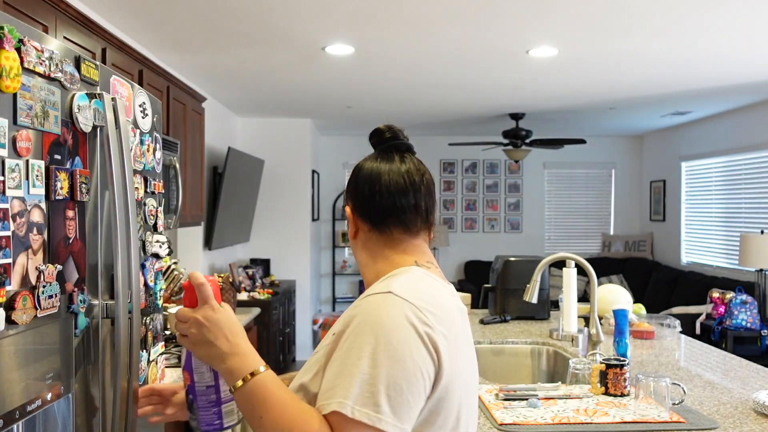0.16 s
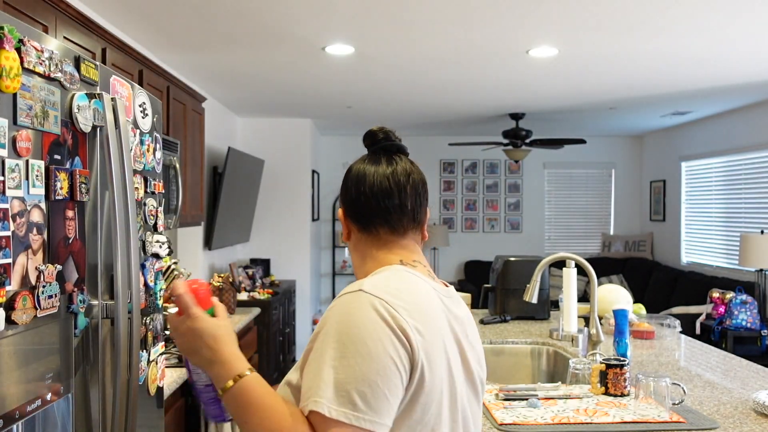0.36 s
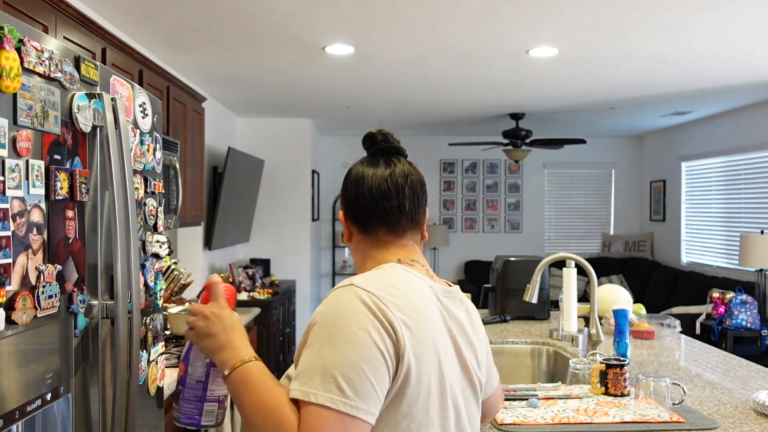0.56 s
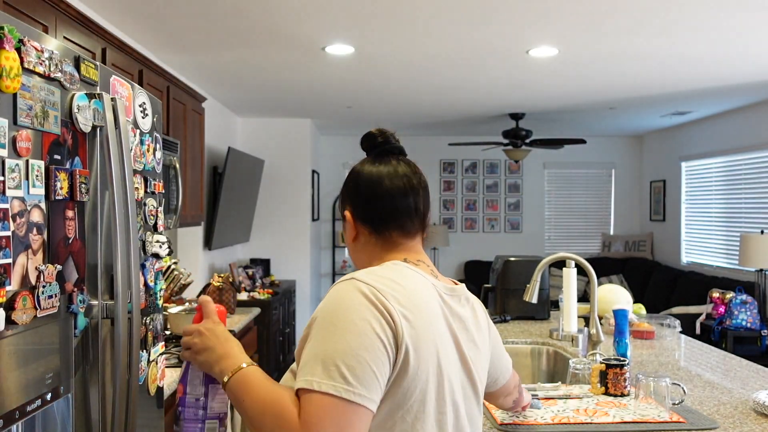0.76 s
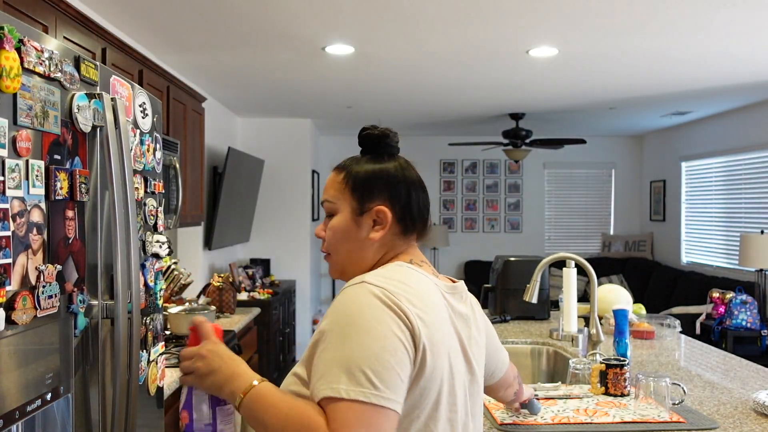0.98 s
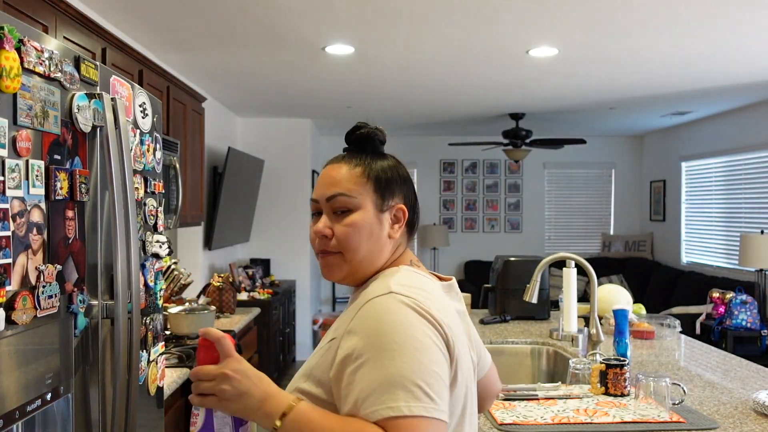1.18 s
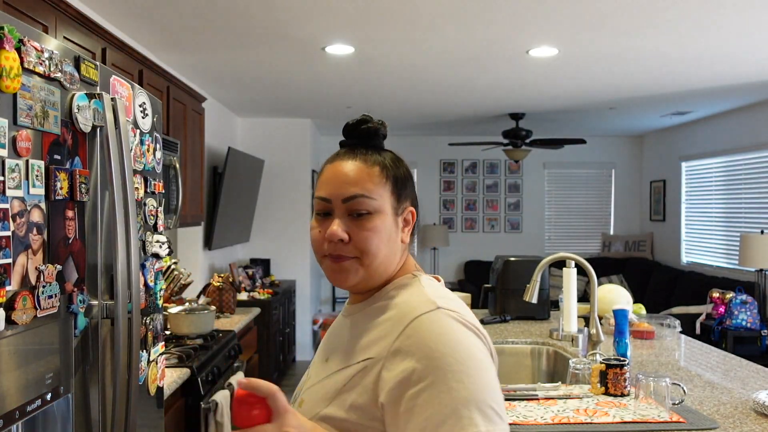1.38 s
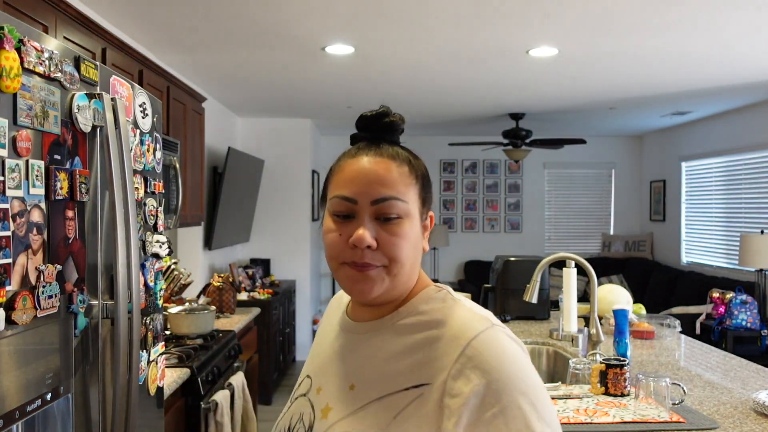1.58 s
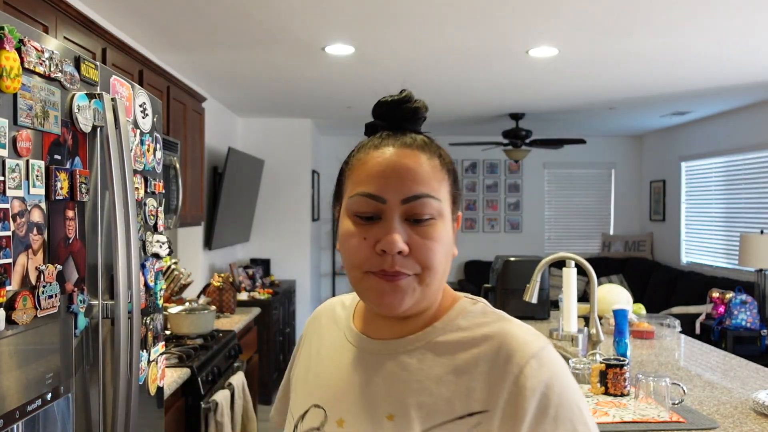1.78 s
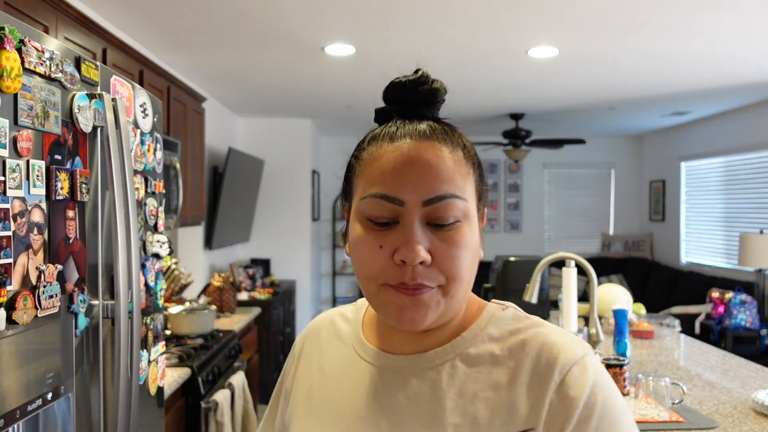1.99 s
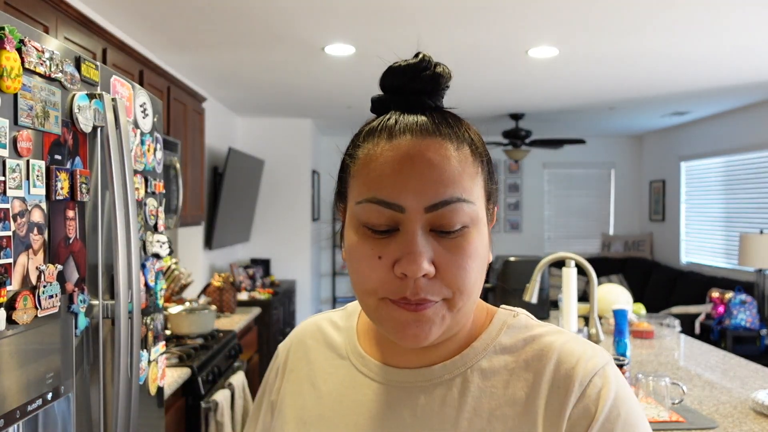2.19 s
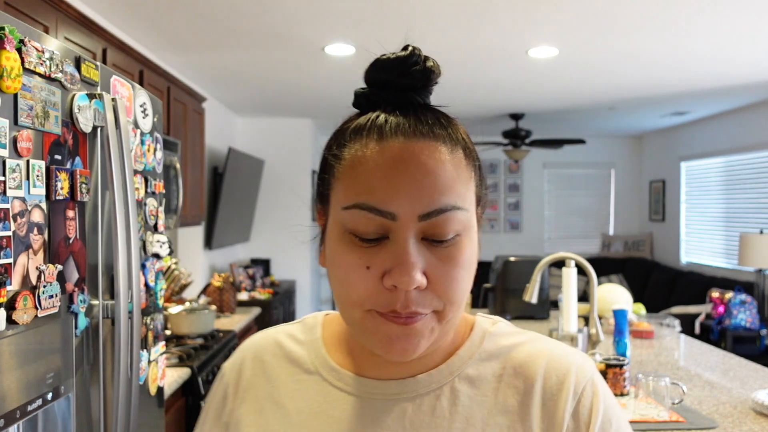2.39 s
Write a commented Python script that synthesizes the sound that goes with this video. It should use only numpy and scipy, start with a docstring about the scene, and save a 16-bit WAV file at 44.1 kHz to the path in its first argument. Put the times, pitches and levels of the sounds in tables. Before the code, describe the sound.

A refrigerator door shuts close by with a sharp thud and a brief rattle of shelves. A plastic bag then rustles and crinkles quietly over a faint kitchen hum, until a hand knocks twice on the microphone and rubs it.

```python
"""A kitchen. A refrigerator door swings shut close by: its edge lands in a few quick contacts,
the cabinet booms, the shelves rattle and the room rings. A plastic bag rustles, crinkles and taps
in a hand over a faint appliance hum. Near the end a hand knocks twice against the microphone's
housing and rubs on it."""
import sys
import numpy as np
from scipy import signal
from scipy.fft import rfft, irfft, next_fast_len
from scipy.io import wavfile
from scipy.ndimage import uniform_filter1d

SR = 44100
rng = np.random.default_rng(int(sys.argv[2]) if len(sys.argv) > 2 else 0)


def int16_out(signal):
    """Quantize to a 16-bit WAV file."""
    q = np.round(np.clip(np.atleast_2d(signal).T, -1, 1) * 32767)
    wavfile.write(sys.argv[1], SR, q.astype(np.int16))


N = 107868
T = np.arange(N) / SR

# Edge contacts (time [s], relative level [dB], tilt [dB/oct], t60 [s], ring [Hz], ring boost [dB])
CONTACTS = [(0.1529, -5.5, 1.5, 0.021, 1340, 5), (.1565, -1, 0.5, .024, 1360, 5.5),
            (0.1592, -6, 2.5, 0.013, 3440, 8.5), (.164, 1.5, -3, 0.029, 2030, 5.5),
            (.168, -12.5, -6, 0.035, 624, 10)]
# Door panel modes; low cabinet modes (frequency [Hz], relative level [dB], t60 [s])
PANEL_MODES = [(406.6, 4, 0.4), (465, 2, 0.34), (524, 20, 0.12), (694, 5.5, 0.26), (887, 1, 0.52),
               (1324, -4, 0.26), (1557, -4, 0.64), (1704, -6, 0.54), (2104, -3, 0.23)]
CABINET_MODES = [(65.1, -18, 0.68), (90.4, 0, 0.34), (126, 0, 0.35), (185, -12, 0.32)]
# Swing rumble (time [s], level [dB])
SWING_ENVELOPE = [(0, -40.5), (.06, -45.5), (.15, -38.5), (.2, -73)]
# Contact, shelf and swing spectra (frequency [Hz], relative density [dB])
CONTACT_SPECTRUM = [(70, -17), (110, -18.5), (190, -8), (400, -8.5), (530, -3.5), (750, -7), (1020, -8),
                    (1350, -1.5), (1900, -5.5), (3600, -9), (5500, -17), (7500, -25), (10000, -26),
                    (15000, -42)]
RATTLE_SPECTRUM = [(55, -9.5), (95, -7), (135, -5), (300, -3.5), (600, -3), (1000, -7.5), (1500, -3),
                   (2500, -9.5), (3700, -15.5), (7000, -25), (10000, -35), (15000, -48)]
SWING_SPECTRUM = [(50, -2), (100, -4.5), (160, -7.5), (400, -13.5), (600, -6), (900, -7.5), (1450, -1.5),
                  (2200, -9.5), (8000, -34.5)]
# Door stereo width (frequency [Hz], side gain [dB])
DOOR_WIDTH = [(60, -25), (500, -11), (4400, -13.5), (8500, -10), (13000, -26)]
def door():
    """The door swings, its edge lands, the panel rings, the cabinet booms and the shelves rattle."""
    edge, body = np.zeros(N), np.zeros(N)
    for start_s, db, tilt_db, t60_s, ring_hz, ring_db in CONTACTS:
        contact = crack(CONTACT_SPECTRUM, t60_s, tilt_db)
        add(edge, start_s, undb(db - 10.5) * resonate(contact, ring_hz, ring_db, q=4.8))
    impact_s = CONTACTS[1][0]
    add(body, impact_s, undb(-34) * ring(PANEL_MODES, rise_s=0.0036))
    add(body, impact_s, undb(-26) * ring(CABINET_MODES, rise_s=0.042))
    shake_start_s, shake_peak_s = 0.167, 0.2
    shake = np.interp(T, [shake_start_s, shake_peak_s], [0, 1])
    shake *= fade(np.maximum(T - shake_peak_s, 0), t60_s=0.43)
    rattle = undb(-19.5) * colour(shake * grains(N, rate_hz=4000, spread_db=1), RATTLE_SPECTRUM)
    swing = curve(SWING_ENVELOPE) * colour(rng.standard_normal(N), SWING_SPECTRUM)
    out = kitchen(edge, wet_db=-6, width=DOOR_WIDTH)
    out += kitchen(rattle + body + swing, wet_db=-15.5, width=DOOR_WIDTH)
    return pan(out, -0.4)


# Knocks (time [s], click gain [dB], thump gain [dB], thump pitch [ratio], tilt [dB/oct], thump lag [s])
KNOCKS = [(2.1776, -31, -30, 1.25, 4, 0.00202), (2.214, -18, -15.5, 1, -1.5, .006)]
# Housing modes at pitch ratio 1 (frequency [Hz], relative level [dB], t60 [s])
HOUSING_MODES = [(89.7, -7, 0.225), (145, 4.5, 0.076), (171.1, -2, 0.23), (212, -8.5, 0.22),
                 (316.6, -25, 0.25), (437, -20, 0.2), (1295, -14, 0.063), (1685, -11.5, 0.077),
                 (4130, -34, .22)]
# Finger rub (time [s], level [dB])
RUB_ENVELOPE = [(2.17, -85), (2.183, -45.5), (2.28, -41), (2.32, -47.5), (2.36, -44), (2.4, -40),
                (2.45, -49.5)]
# Knock and rub spectra (frequency [Hz], relative density [dB])
KNOCK_SPECTRUM = [(350, -4.5), (640, -7), (950, -0.5), (1350, 0), (2000, -4.5), (3000, -11), (4200, -13),
                  (6200, -23), (7200, -24), (10000, -25), (15000, -40)]
RUB_SPECTRUM = [(50, -23), (115, 1.5), (175, 1), (280, -7.5), (400, -16), (570, -12), (1630, -10.5),
                (4340, -23), (8070, -27), (15000, -42)]
def hand_on_housing():
    """Knocks click and thump through the small housing, which radiates little bass; fingers rub."""
    clicks, thumps = np.zeros(N), np.zeros(N)
    for start_s, click_db, thump_db, ratio, tilt_db, lag_s in KNOCKS:
        add(clicks, start_s, undb(click_db) * crack(KNOCK_SPECTRUM, t60_s=0.057, tilt_db=tilt_db))
        add(thumps, start_s + lag_s, undb(thump_db) * ring(HOUSING_MODES, rise_s=0.0056, ratio=ratio))
    rub = colour(curve(RUB_ENVELOPE) * grains(N, rate_hz=2400, spread_db=-1), RUB_SPECTRUM)
    return kitchen(clicks, wet_db=-11) + highpass(thumps, hz=89, order=4) + rub


# Bag and sleeve rustle (time [s], level [dB])
RUSTLE_ENVELOPE = [(0, -39.5), (.14, -46.5), (.3, -54), (.48, -57), (.535, -42.5), (.57, -49), (.68, -46),
                   (.77, -42.5), (.86, -47.5), (.98, -47.5), (1.08, -52), (1.16, -42), (1.23, -39),
                   (1.275, -50), (1.32, -45), (1.38, -42), (1.48, -48), (1.56, -43), (1.74, -49.5),
                   (1.83, -53), (1.92, -63), (2.0, -55.5), (2.3, -55.5), (2.4, -50)]
# Crinkles (peak time [s], level [dB], length [s], tilt [dB/oct], fold ring [Hz], ring boost [dB])
CRINKLES = [(0.598, -36, 0.0092, 1.5, 1500, 8), (0.613, -33.5, .006, 4, 1535, 25),
            (0.624, -39.5, 0.0093, 7, 5000, 12), (0.656, -38, 0.0073, -3, 1543, 12),
            (0.773, -37, 0.0075, -2, 1410, 9), (0.801, -40.5, .012, -3.5, 1500, -2),
            (0.902, -41, 0.011, 2.5, 1550, 7), (0.988, -39, 0.0073, -1, 1530, -15),
            (1.136, -40.5, 0.012, -1.5, 1200, 7), (1.204, -38, 0.0067, 7, 9100, -2),
            (1.213, -31.5, 0.003, 6, 1240, 33), (1.242, -34, 0.005, -1, 1490, 10),
            (1.49, -39, 0.005, -2.5, 1170, -5), (1.549, -32, 0.0077, -2.5, 1570, 13),
            (1.559, -26, 0.0045, -0.5, 3360, 9), (1.632, -30.5, 0.0035, -1.5, 1990, 7),
            (1.645, -33.5, .01, 3.5, 1640, 9)]
# Rustle, crinkle and film snap spectra (frequency [Hz], relative density [dB])
RUSTLE_SPECTRUM = [(120, -27), (200, -10.5), (376, -15), (560, -4), (864, -8.5), (1490, -1.5), (2170, -8),
                   (2900, -3), (3600, -9.5), (5260, -11), (15000, -37.5)]
CRINKLE_SPECTRUM = [(300, -26.5), (450, -13.5), (570, -6.5), (850, -13), (1250, -2.5), (1650, 1.5),
                    (2400, -8), (3000, -6), (5000, -13), (10000, -34.5), (15000, -49)]
SNAP_SPECTRUM = [(6500, 4), (10000, -5), (12000, -14), (15000, -24)]
def bag():
    """Fine creases rustle throughout; folds give way in click clusters with sparse bright snaps."""
    flutter_db = 1.4 * drift(rate_hz=63)
    motion = curve(RUSTLE_ENVELOPE) * undb(flutter_db)
    out = colour(motion * grains(N, rate_hz=2000, spread_db=2), RUSTLE_SPECTRUM)
    size = SR // 8
    for peak_s, db, length_s, tilt_db, fold_hz, fold_db in CRINKLES:
        rise_s = length_s / 2
        age = T[:size] / rise_s
        swell = age * np.exp(1 - age)
        cluster = colour(swell * grains(size, rate_hz=5500, spread_db=1.5), CRINKLE_SPECTRUM, tilt_db)
        snaps = colour(swell * grains(size, rate_hz=550, spread_db=0.5), SNAP_SPECTRUM)
        crinkle = resonate(cluster + undb(tilt_db - 15) * snaps, fold_hz, fold_db, q=14)
        add(out, peak_s - rise_s, undb(db) * unit(crinkle) * np.sqrt(length_s / T[size]))
    return pan(kitchen(out, wet_db=-8.5), -0.5)


# Soft taps (time [s], gain [dB], ring [Hz], ring boost [dB])
TAPS = [(1.396, -35, 1450, 7.5), (1.447, -28.5, 553, 12), (1.799, -35.5, 1150, 7.5)]
# Tap spectrum (frequency [Hz], relative density [dB])
TAP_SPECTRUM = [(400, -13), (560, -5), (800, -9.5), (1200, -3), (1800, -0.5), (2900, -14.5), (4000, -21),
                (7000, -23), (15000, -49)]
def taps():
    """Things in the hand bump softly: a dull contact with one short ring."""
    out = np.zeros(N)
    for start_s, db, ring_hz, ring_db in TAPS:
        contact = crack(TAP_SPECTRUM, t60_s=0.042)
        add(out, start_s, undb(db) * resonate(contact, ring_hz, ring_db, q=8))
    return pan(kitchen(out, wet_db=-8.5), -0.5)


# Room air spectrum (frequency [Hz], relative density [dB])
AIR_SPECTRUM = [(50, -22), (110, -9), (300, -16), (550, -4), (1000, -18), (1500, -11), (2200, -11),
                (3500, -19), (6000, -25), (10000, -31), (15000, -39)]
def appliances():
    """Steady moving air, a fan's broad note and a compressor's hum."""
    fan_hz, fan_width_hz, hum_hz = 615, 230, 104.4
    hz = np.arange(N // 2 + 1) * SR / N
    fan_band = 1 / (1 + (2 * (hz - fan_hz) / fan_width_hz) ** 2)
    fan = unit(irfft(rfft(rng.standard_normal((2, N))) * fan_band, N))
    air = np.array([colour(noise, AIR_SPECTRUM) for noise in rng.standard_normal((2, N))])
    mid, side = undb(-55) * air + undb(-58.5) * fan
    hum_db = -70 + 2 * drift(rate_hz=4.2)
    hum = undb(hum_db) * np.sqrt(2) * np.sin(2 * np.pi * hum_hz * T)
    return stereo(mid, side, ROOM_WIDTH) + hum


# Room decay (frequency [Hz], t60 [s])
ROOM_DECAY = [(80, 1), (300, 0.76), (1400, 0.56), (4000, 0.49), (12000, 0.36)]
# Room stereo width (frequency [Hz], side gain [dB])
ROOM_WIDTH = [(60, -28), (150, -1), (400, -10.5), (700, -7), (2500, -10), (4400, -20), (8500, -16),
              (13000, -36)]
def kitchen(x, wet_db, width=ROOM_WIDTH):
    """Direct sound, near reflections that differ left to right, and a tail dying sooner in the treble."""
    t, hz, rise_s = T[:SR], np.arange(SR // 2 + 1), 0.0094
    noise, tail = rfft(rng.standard_normal((2, SR))), 0
    for centre_hz, t60_s in ROOM_DECAY:
        band = along([(f, f == centre_hz) for f, _ in ROOM_DECAY], hz)
        tail = tail + irfft(noise * band, SR) * fade(t, t60_s)
    tail = undb(wet_db) * unit(tail * np.minimum(t / rise_s, 1)) / np.sqrt(SR)
    mid, side = signal.fftconvolve(x[None], tail, axes=1)[:, :N]
    near = undb(-6.5) * unit(rng.standard_normal(SR) * fade(t, t60_s=0.027)) / np.sqrt(SR)
    return stereo(x + mid, side + signal.fftconvolve(x, near)[:N], width)


def crack(spectrum, t60_s, tilt_db=0):
    """Short contact: a decaying noise burst."""
    size = SR // 8
    return colour(rng.choice([-1., 1.], size) * fade(T[:size], t60_s), spectrum, tilt_db)


def ring(modes, rise_s, ratio=1):
    """Decaying modes with a linear rise."""
    t = T[:SR]
    partials = (undb(db) * np.sin(2 * np.pi * hz * ratio * t) * fade(t, t60) for hz, db, t60 in modes)
    return np.minimum(t / rise_s, 1) * sum(partials)


def grains(size, rate_hz, spread_db):
    """Random clicks of uneven strength, rms 1."""
    strength = undb(spread_db * np.minimum(rng.exponential(size=size), 4))
    hits = rng.random(size) < rate_hz / SR
    return unit(hits * rng.choice([-1, 1], size) * strength + 1e-9)


def drift(rate_hz):
    """Smoothed noise, rms 1."""
    size = int(SR / rate_hz)
    return unit(uniform_filter1d(uniform_filter1d(rng.standard_normal(N), size), size))


def colour(x, spectrum, tilt_db=0):
    """Unit-power filter, tilted per octave, falling steeply below the spectrum's first point."""
    size = next_fast_len(len(x) + 4096) // 2 * 2
    hz = np.maximum(np.arange(size // 2 + 1) * SR / size, 10)
    db = along(spectrum, hz) + tilt_db * np.log2(np.clip(hz, 500, 10000))
    gain = unit(undb(db) / np.sqrt(1 + (.8 * spectrum[0][0] / hz) ** 6))
    cepstrum = irfft(np.log(gain))
    cepstrum[1:size // 2] *= 2  # fold to minimum phase
    cepstrum[size // 2 + 1:] = 0
    return irfft(rfft(x, size) * np.exp(rfft(cepstrum)), size)[:len(x)]


def resonate(x, hz, boost_db, q):
    """Boost or cut one narrow band."""
    b, a = signal.iirpeak(hz, q, fs=SR)
    return x + (undb(boost_db) - 1) * signal.lfilter(b, a, x)


def highpass(x, hz, order):
    """Roll off the bass."""
    return signal.sosfilt(signal.butter(order, hz, "high", fs=SR, output="sos"), x)


def stereo(mid, side, width):
    """Mid and width-filtered side to left and right."""
    hz = np.arange(N // 2 + 1) * SR / N
    side = irfft(rfft(side) * undb(along(width, hz)), N)
    return np.array([mid + side, mid - side])


def pan(x, db):
    """Shift the balance by db, left minus right."""
    return x * undb(np.array([[db], [-db]]) / 2)


def fade(t, t60_s):
    """Exponential decay from t = 0."""
    return (t >= 0) * np.exp(-np.log(1000) * np.maximum(t, 0) / t60_s)


def curve(envelope):
    """Gain from (time [s], level [dB]) points."""
    return undb(np.interp(T, *np.array(envelope, float).T))


def along(table, hz):
    """Interpolate on a log-frequency axis."""
    points_hz, values = np.array(table, float).T
    return np.interp(np.log(hz + 1e-9), np.log(points_hz), values)


def add(out, start_s, x):
    """Mix x in at start_s."""
    i = int(start_s * SR)
    out[i:i + len(x)] += x[:N - i]


def undb(db):
    """Decibels to gain."""
    return 10 ** (np.asarray(db) / 20)


def unit(x):
    """Scale to rms 1."""
    return x / np.sqrt(np.mean(x ** 2))


def scene():
    """Stereo sum of all sources."""
    return door() + bag() + taps() + hand_on_housing() + appliances()


def record(dry):
    """Trim the deepest bass and cut the top."""
    top_hz = 16000
    lowpass = signal.ellip(10, .2, 80, top_hz, fs=SR, output="sos")
    return signal.sosfilt(lowpass, highpass(dry, hz=45, order=2))


dry = scene()
out = record(dry)
int16_out(out)
```